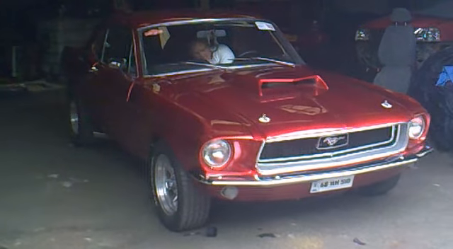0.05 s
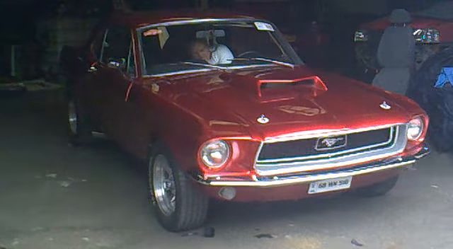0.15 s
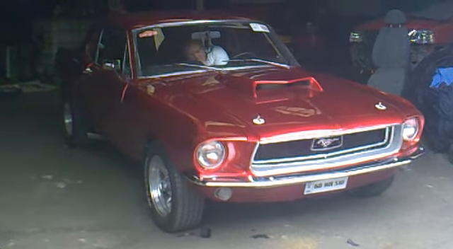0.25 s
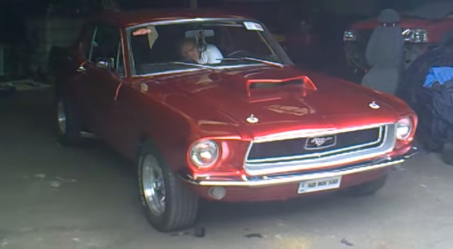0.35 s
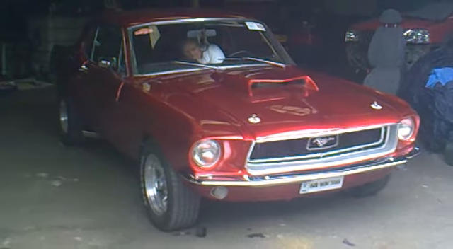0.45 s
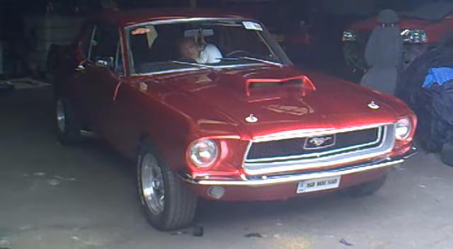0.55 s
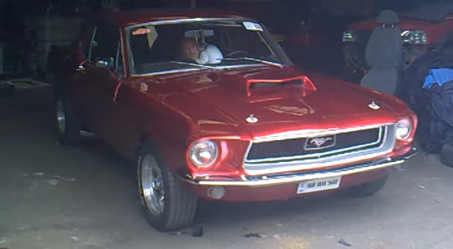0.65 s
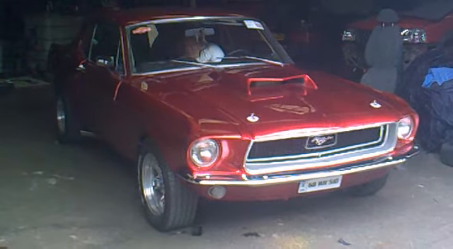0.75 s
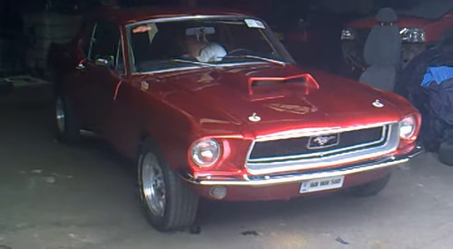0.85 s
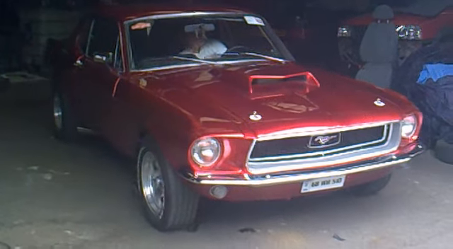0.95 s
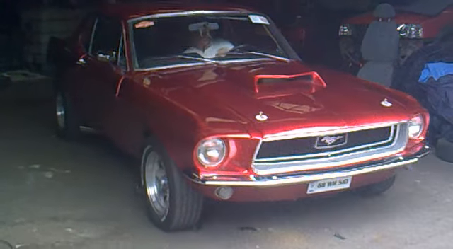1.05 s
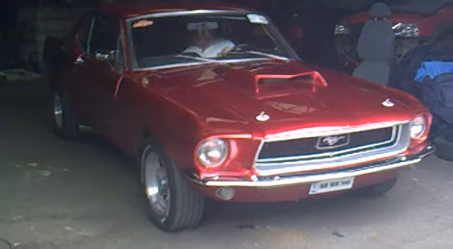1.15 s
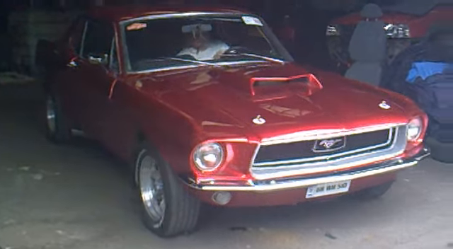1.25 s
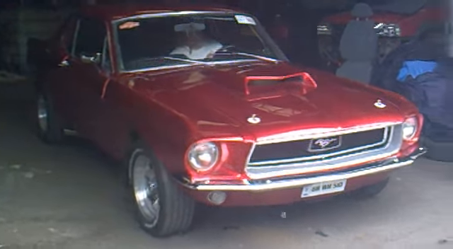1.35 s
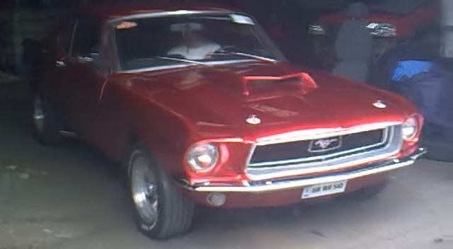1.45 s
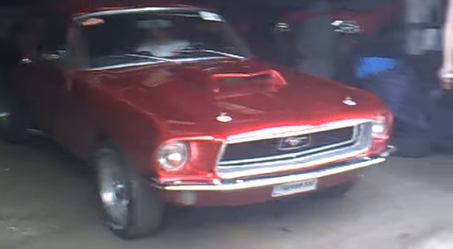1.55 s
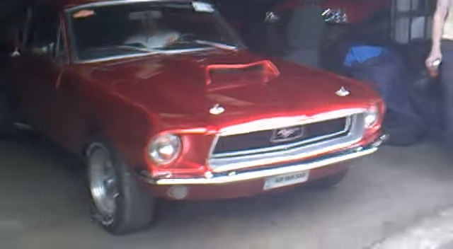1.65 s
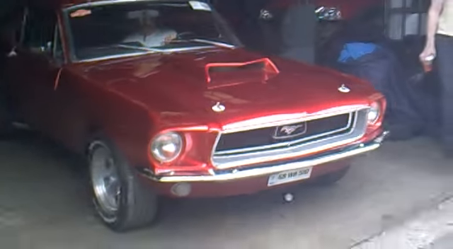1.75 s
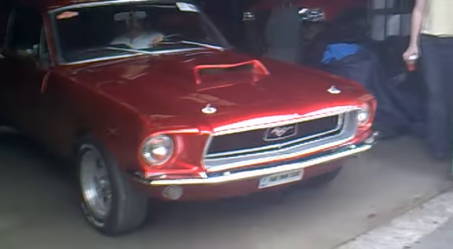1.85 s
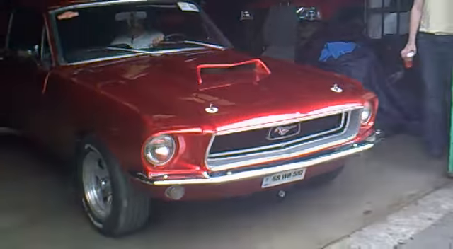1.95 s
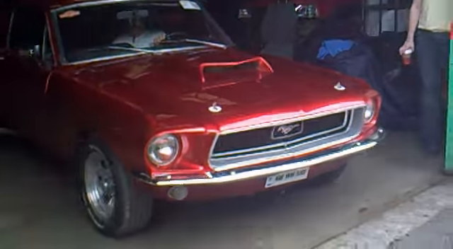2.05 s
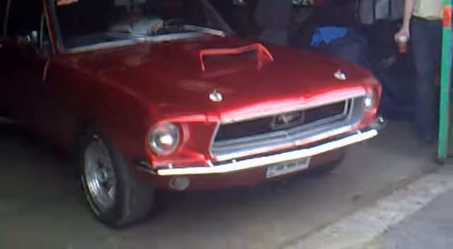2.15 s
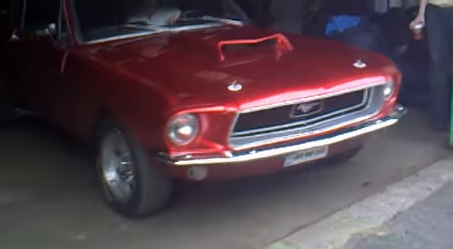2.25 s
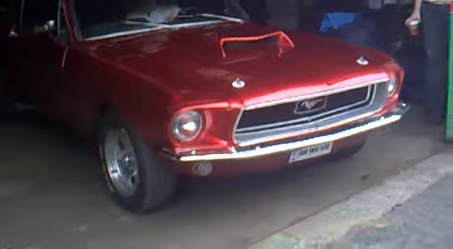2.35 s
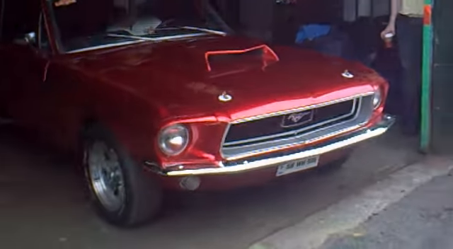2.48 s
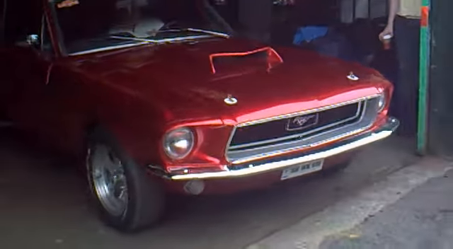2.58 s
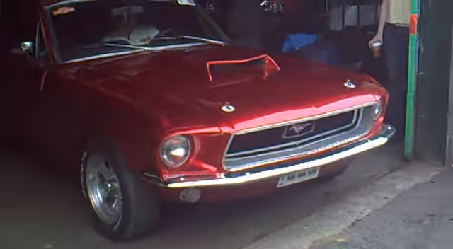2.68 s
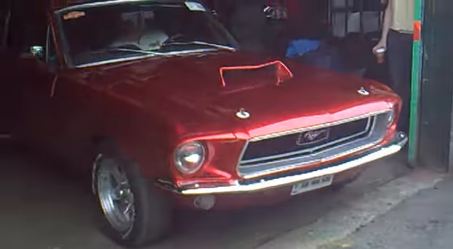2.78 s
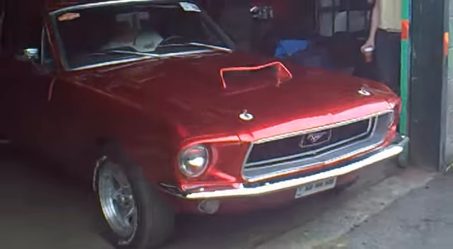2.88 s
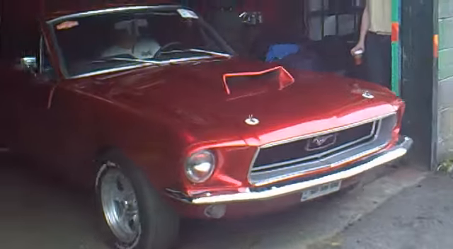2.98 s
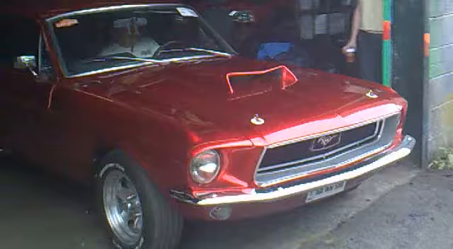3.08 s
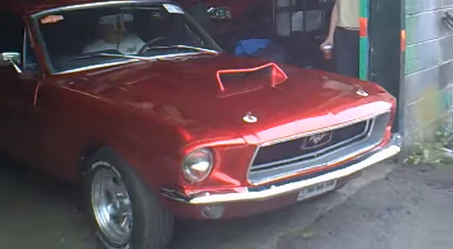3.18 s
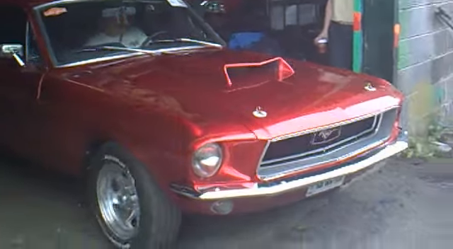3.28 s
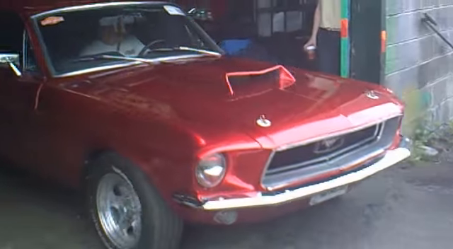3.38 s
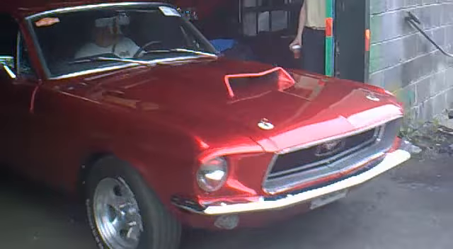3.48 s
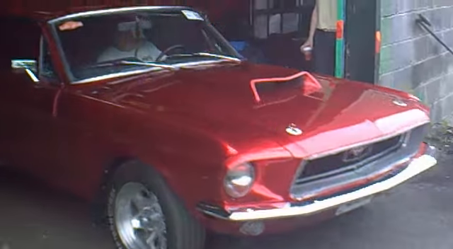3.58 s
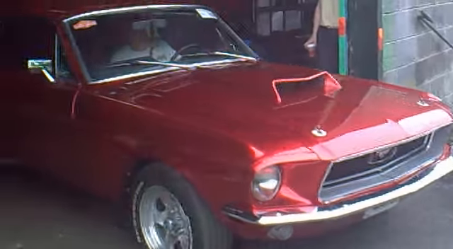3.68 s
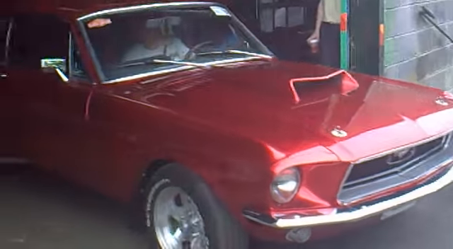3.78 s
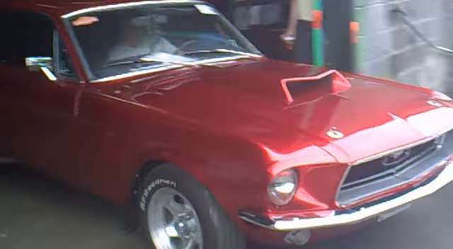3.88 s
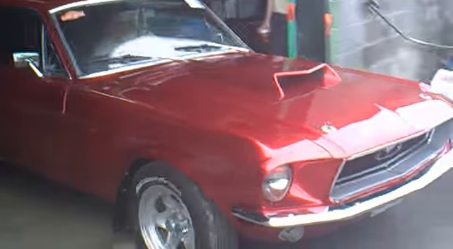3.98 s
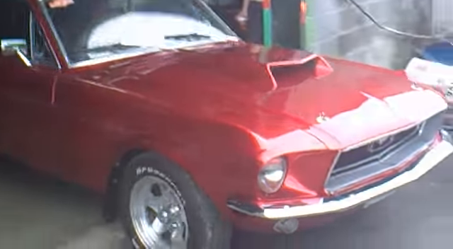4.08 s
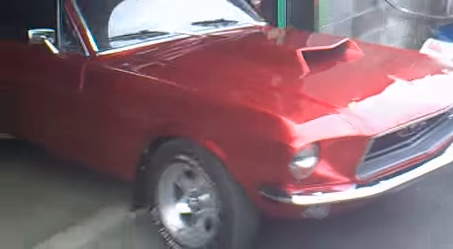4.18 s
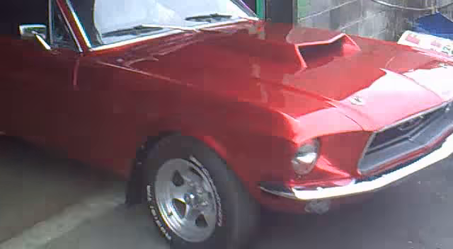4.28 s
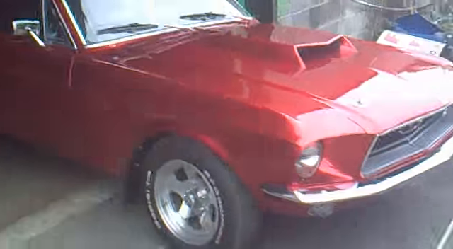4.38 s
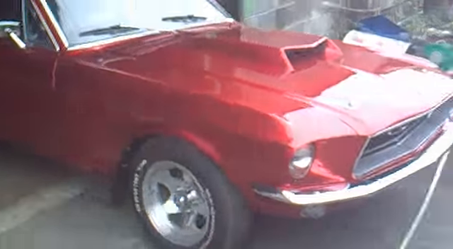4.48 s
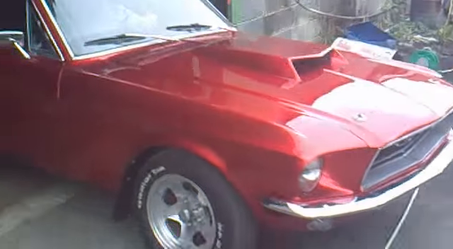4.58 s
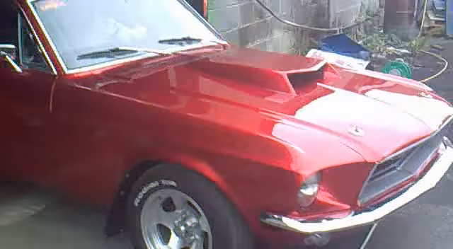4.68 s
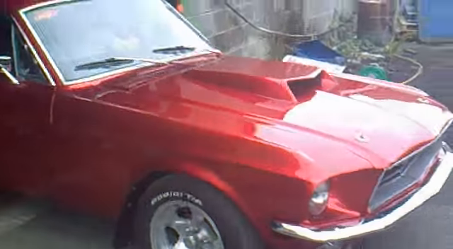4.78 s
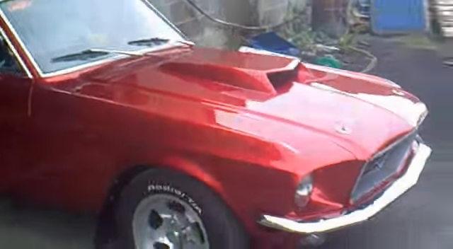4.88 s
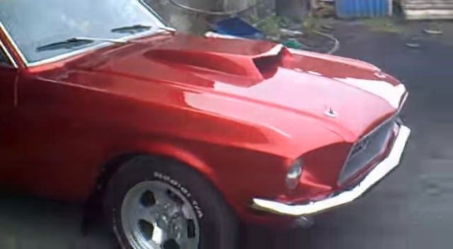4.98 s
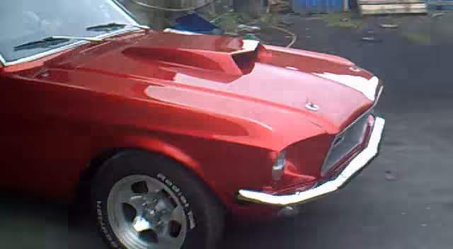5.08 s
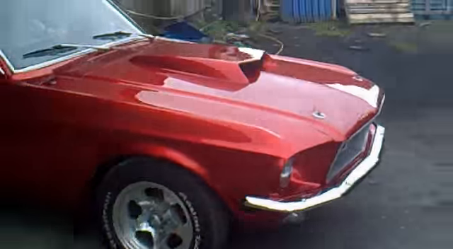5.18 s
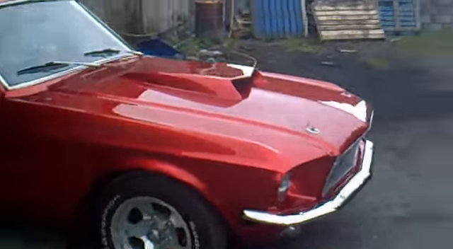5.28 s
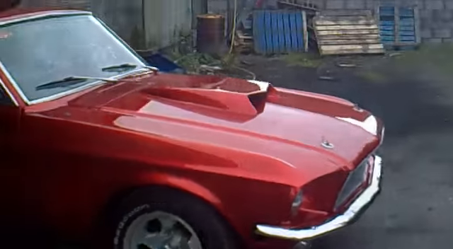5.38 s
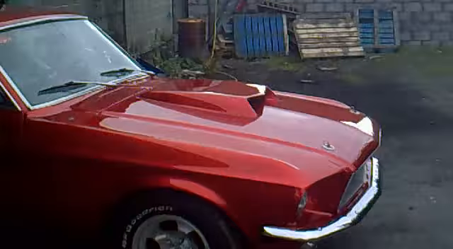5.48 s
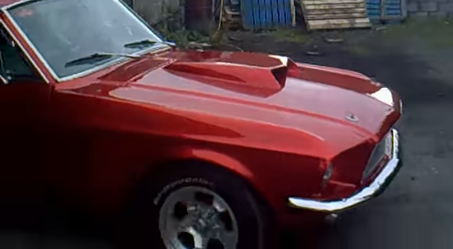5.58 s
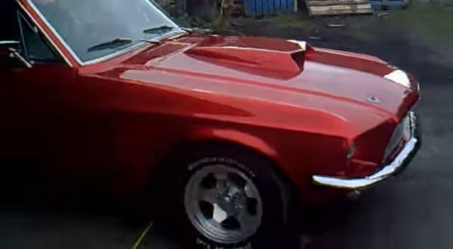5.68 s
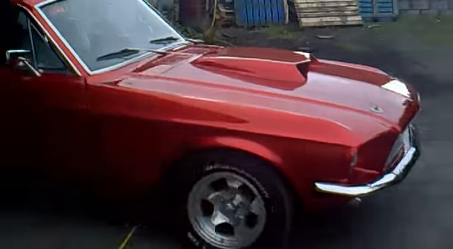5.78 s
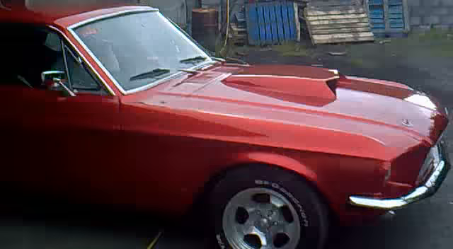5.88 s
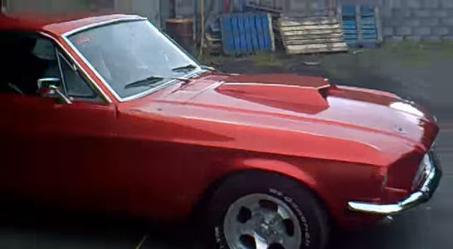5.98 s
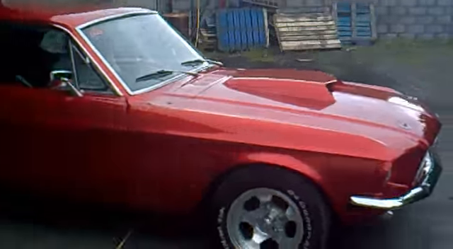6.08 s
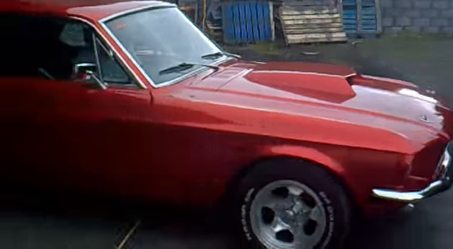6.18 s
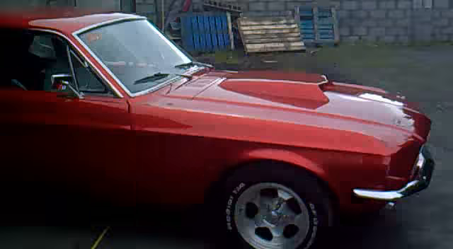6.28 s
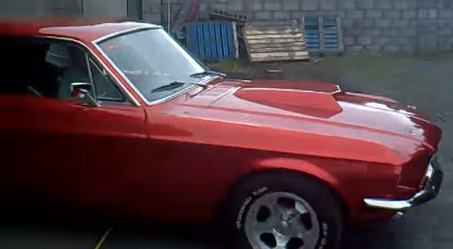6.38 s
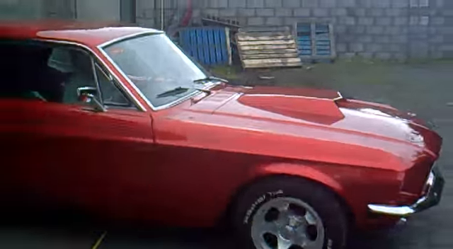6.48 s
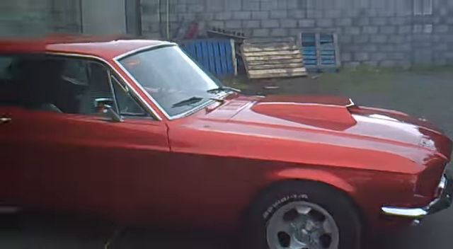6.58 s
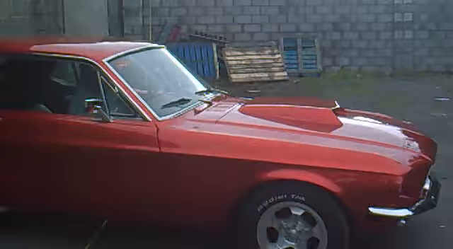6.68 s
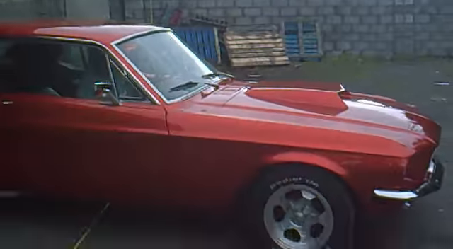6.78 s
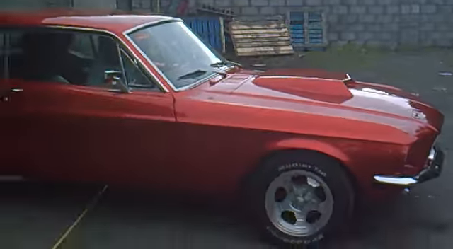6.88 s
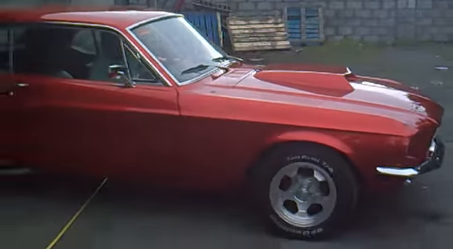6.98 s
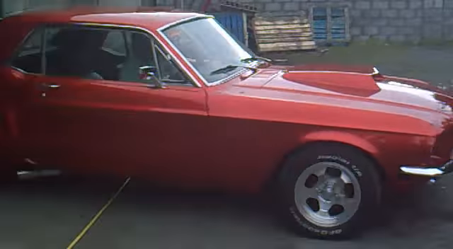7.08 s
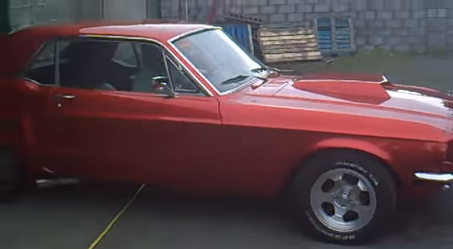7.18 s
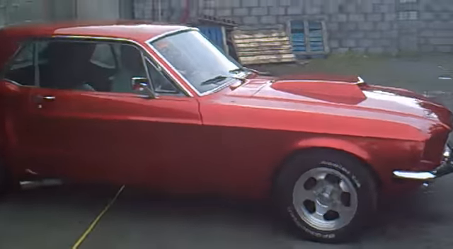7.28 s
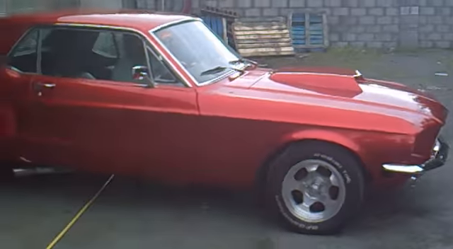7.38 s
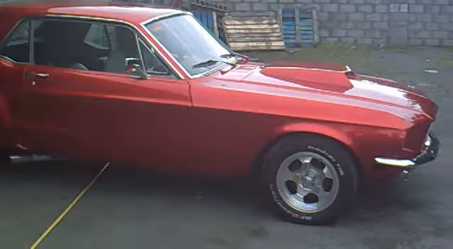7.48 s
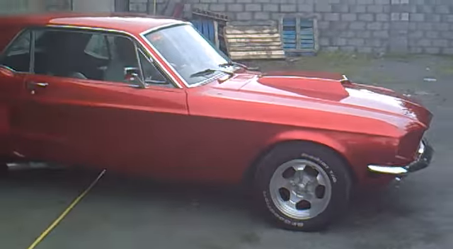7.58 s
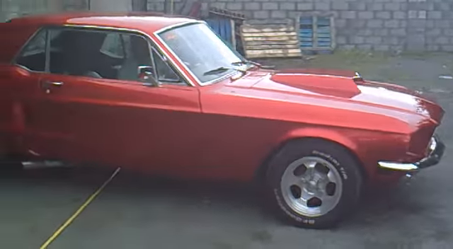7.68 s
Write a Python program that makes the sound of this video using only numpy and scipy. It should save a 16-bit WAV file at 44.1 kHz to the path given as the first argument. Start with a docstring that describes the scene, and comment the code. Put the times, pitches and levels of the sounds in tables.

```python
"""An eight-cylinder car idles fast in a garage, drops its revs with two sharp backfire cracks and creeps
out into a yard. Its exhaust drone is a sum of crank orders phased by uneven firing, plus rough noise.
The near cylinder bank chuffs from its side pipe: gated noise through pipe resonances.
The engine bay rushes as coloured noise; backfires ring the silencer shell; a brake squeaks faintly."""
import sys
import numpy as np
from scipy import signal
from scipy.fft import rfft, irfft, next_fast_len
from scipy.io import wavfile
from scipy.ndimage import map_coordinates

SR = 44100
rng = np.random.default_rng(int(sys.argv[2]) if len(sys.argv) > 2 else 0)


def inscribe(sig):
    """Save sig as 16-bit PCM at rate SR to the path in sys.argv[1].

    A 1-D sig is mono; a 2-D sig holds one channel per row.
    Samples are clipped to [-1, 1] before scaling.
    """
    pcm = np.round(np.clip(np.atleast_2d(sig).T, -1, 1) * 32767)
    wavfile.write(sys.argv[1], SR, pcm.astype(np.int16))


def level_to_linear(level):
    """Convert decibel levels to linear amplitude factors, elementwise."""
    exponent = np.asarray(level, float) / 20
    return 10 ** exponent


N = 341334

# engine speed: (time [s], four-stroke cycles [1/s])
SPEED = [(0.0, 12.149), (0.375, 12.711), (0.75, 12.685), (1.0, 9.393), (1.125, 8.005), (1.25, 8.191),
         (1.75, 9.499), (2.75, 9.272), (3.25, 9.288), (4.0, 9.351), (4.25, 8.511), (4.75, 8.677),
         (5.25, 8.602), (5.75, 8.734), (6.0, 8.434), (6.25, 8.518), (7.25, 8.325), (7.74, 8.074)]
# relative pulse size of each firing in a cycle; near bank 0, 3, 5, 6; sets the phases of the orders
FIRING = [.9, .5, .24, 1, .47, .82, .72, .1]
# place and exhaust: (time [s], place [0 fast idle, 1 doorway, 2 yard; held beyond],
# fade of all but the two strong orders [dB], rough burning before the fade [dB])
PLACE = [(0, 0, -0.5, -49), (.78, 0, 0.5, -49), (1.1, 0.46, -3.5, -46), (1.22, 1.3, -1, -40),
         (1.4, 1.4, -0.5, -38), (1.6, 1.1, -0.5, -39.5), (1.9, 1, -1.5, -45), (4.0, 1.3, -1, -40),
         (4.7, 2, 0.5, -44), (5.8, 2.2, 0.5, -41.5), (7.5, 2, 1, -43.5), (7.74, 3.5, -9.5, -40)]

# two strong drone orders: (time [s], order 8 [dB], order 11 [dB])
STRONG_ORDERS = [(0, -32, -41), (.2, -42, -44), (.6, -33.5, -42), (.75, -44, -42), (.88, -24.5, -39),
                 (.95, -31, -40), (.99, -25, -34), (1.025, -38, -38), (1.12, -42, -38.5), (1.2, -42, -29),
                 (1.45, -29, -31.5), (1.6, -24, -28), (1.7, -22.5, -33.5), (1.95, -28.5, -35),
                 (3.25, -24.5, -31.5), (3.8, -35, -31.5), (4.08, -34, -30), (4.2, -26, -31.5),
                 (4.4, -30, -37.5), (4.6, -29, -27.5), (5.4, -37, -22), (6.4, -29.5, -24),
                 (7.1, -29, -23.5), (7.5, -36, -25.5), (7.74, -41, -36.5)]
# orders that stand out: (multiple of cycle rate, fast idle [dB], doorway [dB], yard [dB])
STANDOUT_ORDERS = [(5, -49, -47, -41), (7, -42, -47, -50), (9, -46, -39, -39), (10, -57, -40.5, -41.5),
                   (12, -54, -50, -57), (13, -50, -46, -40), (15, -46, -48, -52), (16, -38, -48, -49),
                   (19, -57, -43, -44), (21, -44, -50, -45), (23, -56, -48, -48), (18, -47, -54, -58),
                   (22, -54, -57, -57), (24, -49, -52, -53), (25, -58, -64, -54), (26, -58, -53, -46),
                   (27, -44, -52, -54), (30, -59, -51, -46), (31, -69, -50, -58), (32, -71, -55, -58),
                   (33, -71, -62, -56), (35, -70, -60, -59), (37, -70, -62, -57), (42, -54, -67, -64)]
# knots of the slope of all other orders: (multiple of cycle rate, fast idle [dB], doorway [dB], yard [dB])
LESSER_ORDERS = [(3, -63, -56, -52), (6, -46, -53, -58), (14, -52, -50, -45), (17, -46, -49, -54),
                 (20, -58, -49, -48), (29, -61, -65, -54), (33, -72, -61, -62), (41, -69, -69, -65)]
# orders left off the slope: 4 cancels between the banks; 8 and 11 have their own curve
OFF_SLOPE = (4, 8, 11)
# orders that the standing wave in the pipe sends out with opposite sign
INVERTED = (6, 7, 13, 29, 30)
# orders that turn over in the doorway
DOORWAY_INVERTED = (5, 12, 24)
# orders whose phase runs late in the doorway
DOORWAY_LATE = (3, 5, 6, 7, 10, 14, 23)
# orders whose phase runs early in the doorway
DOORWAY_EARLY = (15, 19)
# uneven burning between the orders: (frequency [Hz], relative level [dB per Hz])
ROUGH = [(20, -25), (45, -12), (90, -1), (180, -3), (280, -6), (350, -4.5), (400, -24), (480, -27),
         (600, -45), (900, -120)]
# body shake below the drone: (frequency [Hz], relative level [dB per Hz])
RUMBLE = [(8, -20), (22, 0), (50, -2), (70, -20), (120, -120)]

# engine-bay rush: (time [s], level before band offsets [dB])
RUSH = [(0, -46), (.52, -44.5), (.99, -46), (1.22, -50.5), (1.36, -42), (1.7, -39), (1.9, -42),
        (2.5, -42.5), (2.82, -41.5), (3.1, -41.5), (3.9, -42), (4.12, -44.5), (4.35, -45.5), (4.7, -42),
        (5.6, -41), (6.8, -41), (7.07, -41.5), (7.5, -43), (7.63, -43), (7.74, -50)]
# offset from the rush for pipe body, mouth, hiss: (fast idle [dB], doorway [dB], yard [dB])
BAND_OFFSETS = [(-1, -2, -4.5), (-0.8, -0.46, -1.56), (-10, -9.5, -10.5)]
# steady engine-bay colour, pipe-body range: (frequency [Hz], relative level [dB per Hz])
BODY_COLOUR = [(240, -43), (400, -5), (437, -16), (647, 2), (773, -5), (844, -2.5), (914, -17.5),
               (1150, -15.5), (1500, -43), (2530, -120)]
# the same in the range of the mouth
MOUTH_COLOUR = [(620, -27), (1050, -4.5), (1260, -6.5), (1400, -4), (1520, -4), (1690, -5.5), (2170, -0.5),
                (3380, -11), (3500, -13), (4550, -15.5), (7700, -120)]
# the same in the hiss range
HISS_COLOUR = [(1940, -4), (3300, -9.5), (4550, -10.5), (4830, -8.5), (5220, -7), (6440, -3), (8370, -14.5),
               (9990, -13.5), (12200, -16.5), (13300, -23), (15100, -17.5), (15800, -33)]

# near-bank chuffs: (firing [eighths of a cycle], body [dB], mouth [dB], hiss [dB], collector [dB],
# body gain in the yard [dB], low thump [dB])
CHUFFS = [(0, -10, -4.5, 6.5, 2.5, 6, -3.5), (3.001, -10, -4.5, 8, -8, 7, -13),
          (5, -4, -5, -4, -3.5, -4, -4.5), (6, -4.5, -1.5, 7, 4, -2, 0)]
# hardest chuffs: (time [s], extra level before each band's accent share [dB])
ACCENTS = [(3.786, 1.5), (5.458, 4.5), (5.505, 3), (5.573, 3.5), (5.687, 6.5), (5.717, 5.5), (5.73, 3),
           (5.801, 5.5), (5.949, 4), (6.037, 4.5), (6.082, 3), (6.199, 5), (6.317, 3), (6.389, 3.5),
           (6.537, 4), (6.67, 7), (6.7, 4), (6.79, 4.5), (6.938, 3), (7.148, 3), (7.223, 4), (7.253, 5),
           (7.419, 4), (7.463, 4), (7.623, 2)]
# side pipe turning toward the microphone, chuff share of each band, clipped to 0-1:
# (time [s], pipe body, mouth, jet)
PIPE_SHARE = [(0, 0.12, 0, 0.013), (1.3, 0.03, 0.047, 0.22), (2.2, 0.63, 0.34, 0.18),
              (3.0, 0.95, 0.2, 0.25), (3.6, 0.78, 0.49, 0.25), (4.6, 0.56, 0.45, 0.41),
              (5.5, 0.16, 0.67, 0.51), (6.4, 0.18, 0.79, 0.56), (7.3, 0.22, 0.79, 0.62),
              (7.74, 0.057, 0.88, 0.6)]
# chuff resonances of pipe body, mouth, jet: (frequency [Hz], width per pass [Hz], relative level [dB])
RINGS = [
    [(617, 180, 4.5), (704, 144, 3.5), (832, 180, -1.5)],
    [(1840, 300, 0), (2190, 290, 4), (2504, 303, 2.5)],
    [(3600, 310, -3), (4630, 920, -1), (6000, 1670, 5), (8500, 2100, -4), (10600, 2900, -7.5),
     (14500, 3500, -15)],
]
# mouth rings trading places as the car rolls by: (time [s], gain of ring 1, 2, 3 [dB])
MOUTH_GAINS = [(4.6, 0, 0.37, -0.98), (5.2, -1, -0.7, 0.64), (5.7, -1.8, -2, 2.5), (6.2, 0.25, 1.2, -1.2),
               (6.8, -0.73, 1.5, -2), (7.4, -1.4, -0.13, 0.32)]
# collector rings: (frequency [Hz], width per pass [Hz])
COLLECTOR_RINGS = [(880, 141), (1240, 95), (1510, 100)]
# they come and go as the car turns: (time [s], level of ring 1, 2, 3 [dB])
COLLECTOR_LEVELS = [(0, -67, -61.5, -57), (1.6, -58, -58, -69), (2.2, -54, -51, -64), (2.9, -51, -50, -63),
                    (3.6, -52, -57, -57), (4.1, -50, -56, -53), (4.7, -49, -53, -48.5),
                    (5.2, -53, -54, -59), (6, -55, -65, -58), (6.8, -63, -57.5, -66), (7.3, -70, -49, -59),
                    (7.74, -71, -58, -70)]
# thin high ping on the chuffs while the car passes the doorway: (time [s], level [dB])
PING = [(1.9, -75), (2.3, -62), (2.6, -60), (3.0, -58), (3.3, -58), (3.6, -72), (4.3, -68), (4.8, -62),
        (5.3, -75)]

# backfires and rattling after-pops: (time [s], peak [dB], favoured ring [Hz], crack [dB],
# rise constant [s], garage gain [dB])
BANGS = [(1.1955, -2.5, 740, -7.5, 0.00044, -12), (1.212, -17, 1150, -15, 0.0017, -3),
         (1.232, -26, 900, -21, .003, -4), (1.257, -25, 850, -15, 0.0036, -5),
         (1.268, -19.5, 845, -15, 0.0021, -2), (1.298, 0, 2400, -1.5, 0.00017, -12.5),
         (1.355, -28, 3020, -7, .003, 8.5), (1.411, -22, 1480, -7, 0.0058, -2),
         (1.538, -21.5, 1420, -6, 0.003, -7), (1.553, -25, 1600, -6, .003, -5)]
# silencer modes: (frequency [Hz], level [dB], t60 [s])
SHELL = [(722, -1.5, 0.036), (835, -4, 0.035), (1050, -10, 0.04), (1272, -3, 0.052), (1440, -6.5, 0.044),
         (1666, 0.5, 0.029), (2224, -3, 0.02), (2930, -3, 0.016), (3270, -3.5, 0.018)]
# crack colour: (frequency [Hz], relative level [dB per Hz])
CRACK = [(300, -62), (600, -26), (850, -2.5), (1700, 2), (3000, 1), (4000, -8), (5200, -8.5), (7500, -14),
         (12000, -22.5), (16000, -37)]
# garage decay: (frequency [Hz], t60 [s])
GARAGE = [(500, 0.55), (2000, 0.46), (10000, 0.43)]
# thin whines and squeaks: (time [s], length [s], frequency [Hz], level [dB])
SQUEAKS = [(.23, 0.51, 1470, -50.5), (2.358, 0.063, 10150, -61), (4.055, 0.075, 10100, -59),
           (4.5, 0.077, 10220, -57), (4.6, .06, 10100, -70)]

FIRINGS = len(FIRING)
LAG_EIGHTHS = .04  # sound behind the crank
CHUFF_LEAD_EIGHTHS = .2  # chuff starts before the crest of its pressure pulse
BODY_LEAD_EIGHTHS = .302  # pipe body ahead of mouth and jet
THUMP_LEAD_EIGHTHS = .59
FAST_IDLE_HZ = 12.1  # cycles per s


def unit(x):
    """Scaled to rms 1."""
    return x / np.sqrt(np.mean(x ** 2) + 1e-20)


def along(points, hz):
    """Interpolates (Hz, value) points on a log frequency axis."""
    f, v = np.transpose(points)
    return np.interp(np.log(hz + 1), np.log(f + 1), v)


def curves(rows):
    """One value per sample for each column after the time."""
    s, *cols = np.transpose(rows)
    return [np.interp(np.arange(N) / SR, s, c) for c in cols]


def wobble(rate_hz):
    """Random curve, straight between rate_hz knots a second."""
    knots = rng.standard_normal(int(N * rate_hz / SR) + 4)
    return map_coordinates(knots, [np.arange(N) * rate_hz / SR], order=1)


def coloured(x, spectrum):
    """x through a spectrum, at rms 1."""
    m = next_fast_len(len(x) + 8192)
    gain = level_to_linear(along(spectrum, np.fft.rfftfreq(m, 1 / SR)))
    return unit(irfft(rfft(x, m) * gain, m)[:len(x)])


def ringing(x, hz, width_hz):
    """x through one resonance, twice, at rms 1."""
    m = next_fast_len(len(x) + 8192)
    f = np.fft.rfftfreq(m, 1 / SR)
    response = 1j * f * width_hz / (hz * hz - f * f + 1j * f * width_hz)
    return unit(irfft(rfft(x, m) * response ** 2, m)[:len(x)])


def crank():
    """Four-stroke cycles turned since the start, less the lag of the sound."""
    return np.cumsum(curves(SPEED)[0]) / SR - LAG_EIGHTHS / FIRINGS


def scatter(cycle, db):
    """Random dB for every cycle and near-bank firing."""
    return db * rng.standard_normal((int(cycle[-1]) + 3, len(CHUFFS)))


def chuffs(cycle, sizes_db, rise_s, t60_s, accent, pop=0):
    """Noise gated by each near-bank firing: quick rise, short decay; pop is the leading pressure step."""
    kicks = np.zeros(N)
    for (firing, *_), size_db in zip(CHUFFS, sizes_db.T):
        at = np.flatnonzero(np.diff(np.floor(cycle - firing / FIRINGS)) > 0)
        kicks[at] = level_to_linear(size_db[:len(at)])
    for s, extra_db in ACCENTS:
        kicks[round((s - .008) * SR):round((s + .005) * SR)] *= level_to_linear(accent * extra_db)
    t = np.arange(SR // 10) / SR
    envelope = (1 - np.exp(-t / rise_s)) * level_to_linear(-60 * t / t60_s)
    gate = signal.fftconvolve(kicks, envelope)[:N]
    return gate * rng.standard_normal(N) + pop * kicks


def squeaks():
    """Short friction tones, slightly unsteady in pitch and level."""
    out = np.zeros(N)
    for s, length_s, hz, db in SQUEAKS:
        at = slice(round(s * SR), round((s + length_s) * SR))
        turns = np.cumsum(hz * (1 + 0.0024 * wobble(60)[at])) / SR
        level = level_to_linear(db + 2 * wobble(30)[at]) * signal.windows.tukey(len(turns), .25)
        out[at] = level * np.sin(2 * np.pi * turns)
    return out


def rush_and_chuffs(cycle):
    """Steady engine-bay noise mixed with the chuffs by band; each chuff rings each mode at a new strength."""
    # (steady colour, rise s, t60 s, scatter dB, accent share, pop)
    bands = [(BODY_COLOUR, .003, .09, 1.4, .6, 4),
             (MOUTH_COLOUR, .001, .05, 2.1, 1.05, 10),
             (HISS_COLOUR, .0022, .068, 3, .2, 0)]
    burn_db = scatter(cycle, 0.62)  # shared by all bands
    level_db, place = curves(RUSH)[0], curves(PLACE)[0]
    outdoors = np.clip(np.interp(np.arange(len(burn_db)), cycle, place) - 1, 0, 1)
    yard_db = np.outer(outdoors, np.array(CHUFFS)[:, 5])
    out = 0
    for k, (band, offset_db, share) in enumerate(zip(bands, BAND_OFFSETS, curves(PIPE_SHARE))):
        colour, rise_s, t60_s, scatter_db, accent, pop = band
        lead = (CHUFF_LEAD_EIGHTHS + (k == 0) * BODY_LEAD_EIGHTHS) / FIRINGS
        turns_db = curves(MOUTH_GAINS) if k == 1 else np.zeros(len(RINGS[k]))
        gated = 0
        for (hz, width_hz, ring_db), turn_db in zip(RINGS[k], turns_db):
            sizes_db = np.array(CHUFFS)[:, k + 1] + burn_db + scatter(cycle, scatter_db) + (k == 0) * yard_db
            blown = chuffs(cycle + lead, sizes_db, rise_s, t60_s, accent, pop)
            gated = gated + level_to_linear(ring_db + turn_db) * ringing(blown, hz, width_hz)
        steady = coloured(rng.standard_normal(N) * level_to_linear(0.93 * wobble(20)), colour)
        share = np.clip(share, 0, 1)
        mixed = np.sqrt(1 - share) * steady + np.sqrt(share) * unit(gated)
        out = out + level_to_linear(level_db + np.interp(place, range(3), offset_db) + 3.75 * share) * mixed
    return out


def ping(cycle):
    """A narrow ring struck by every chuff, sized by its hiss."""
    sizes_db = np.array(CHUFFS)[:, 3] + scatter(cycle, 2.9)
    struck = chuffs(cycle + CHUFF_LEAD_EIGHTHS / FIRINGS, sizes_db, .001, .04, accent=0, pop=8)
    return level_to_linear(curves(PING)[0]) * ringing(struck, hz=3665, width_hz=190)


def collector(cycle):
    """Chuffs ringing the exhaust collector."""
    out = 0
    for (hz, width_hz), db in zip(COLLECTOR_RINGS, curves(COLLECTOR_LEVELS)):
        sizes_db = np.array(CHUFFS)[:, 4] + scatter(cycle, 3)
        blown = chuffs(cycle + CHUFF_LEAD_EIGHTHS / FIRINGS, sizes_db, 0.00051, 0.074, accent=0.27)
        out = out + level_to_linear(db) * ringing(blown, hz, width_hz)
    return out


def garage(x):
    """Delayed noise tail; each frequency of the walls' answer dies at its own speed."""
    hz, t, z = signal.stft(rng.standard_normal(SR // 2), SR, nperseg=256)
    tail = signal.istft(z * level_to_linear(-60 * t / along(GARAGE, hz)[:, None]), SR, nperseg=256)[1]
    return signal.fftconvolve(np.pad(x, (300, 0)), tail / np.linalg.norm(tail))


def shell_ring(t, best_hz):
    """Decaying silencer modes, detuned per blow, phase-walking, weaker away from best_hz."""
    off_pitch_db_per_octave, detune, rattle_rad = 8, 0.02, 0.048  # rattle: phase step per sample
    out = 0
    for hz, mode_db, t60_s in SHELL:
        db = mode_db + rng.normal(0, 1.4) - off_pitch_db_per_octave * abs(np.log2(hz / best_hz))
        phase = 2 * np.pi * (hz * rng.normal(1, detune) * t + rng.random())
        walk = np.cumsum(rng.normal(0, rattle_rad, len(t)))
        out = out + level_to_linear(db - 60 * t / t60_s) * np.sin(phase + walk)
    return out


def backfires():
    """A crack of noise, the silencer shell's ring and the air column's hum, answered by the garage."""
    blast_db, blast_s = 2, 0.0018  # the first instant is hotter than the ring
    boom_hz, boom_db, boom_t60_s = 226, -29, 0.4  # air column of the pipe
    highpass = signal.butter(5, 624, 'high', fs=SR, output='sos')  # small shell radiates little below
    out, t = np.zeros(N + SR), np.arange(SR // 10) / SR
    for s, peak_db, best_hz, crack_db, rise_s, room_db in BANGS:
        crack = level_to_linear(crack_db - 60 * t / 0.053) * coloured(rng.standard_normal(len(t)), CRACK)
        envelope = (1 - np.exp(-t / rise_s)) * (1 + level_to_linear(blast_db) * np.exp(-t / blast_s))
        burst = signal.sosfilt(highpass, (shell_ring(t, best_hz) + crack) * envelope)
        burst = level_to_linear(peak_db) * burst / np.max(np.abs(burst))
        boom = level_to_linear(peak_db + boom_db - 60 * t / boom_t60_s) * np.sin(2 * np.pi * boom_hz * t)
        boom = boom * signal.windows.tukey(len(t), .3)
        wet = level_to_linear(room_db) * garage(burst)
        out[round(s * SR):][:len(t)] += burst + boom
        out[round(s * SR):][:len(wet)] += wet
    return out[:N]


def rough_burning(cycle):
    """Uneven burning: low noise in a thump per near-bank firing, over a steady floor; rms 1."""
    between_db = -10  # level between thumps
    sizes_db = np.array(CHUFFS)[:, 6] + scatter(cycle, 2)
    thumps = unit(chuffs(cycle + THUMP_LEAD_EIGHTHS / FIRINGS, sizes_db, 0.0027, 0.15, accent=0))
    return coloured(thumps + level_to_linear(between_db) * rng.standard_normal(N), ROUGH)


def order_levels():
    """Rows (order, dB in each place): the slope, with the orders that stand out put in."""
    knots, *slopes = np.transpose(LESSER_ORDERS)
    rows = {k: [np.interp(k, knots, db) for db in slopes] for k in range(3, 42) if k not in OFF_SLOPE}
    rows.update({k: db for k, *db in STANDOUT_ORDERS})
    return [(k, *db) for k, db in rows.items()]


def drone(cycle):
    """Exhaust orders phased by uneven firing; deep in the garage, wall echoes scramble the higher ones."""
    deep_lag_cycles = .0625  # longer sound path from deep in the garage
    deep_early_turn = .17  # order 8 runs ahead in phase deep in the garage, in its own periods
    late_turn, early_turn = .15, .25  # doorway phase turns, in the order's own periods
    strong_waver_db, waver_db, indoor_waver_db = 1.5, 1.6, 1.5  # wall echoes add waver indoors
    phase = np.angle(np.fft.fft(FIRING))
    place, fade_db, rough_db = curves(PLACE)
    indoors = np.clip(1 - place, 0, 1)
    doorway = np.clip(2 - 5 * abs(place - 1), 0, 1)
    heard = cycle - deep_lag_cycles * indoors

    def order(k, turn):
        return np.sqrt(2) * np.cos(2 * np.pi * k * heard + phase[int(k) % FIRINGS] + turn)

    strong = 0
    for k, db in zip((8, 11), curves(STRONG_ORDERS)):
        turn = 2 * np.pi * deep_early_turn * indoors * (k == 8)
        strong = strong + level_to_linear(db + strong_waver_db * wobble(9)) * order(k, turn)

    orders, idle_db, door_db, yard_db = np.transpose(sorted(order_levels()))
    # below fast idle the garage's peaks stay at their pitch and higher orders pass through them
    slowed = np.minimum(curves(SPEED)[0] / FAST_IDLE_HZ, 1)
    weak = 0
    for k, door, yard in zip(orders, door_db, yard_db):
        db = np.interp(place, [1, 2], [door, yard])
        db = db + indoors * (np.interp(k * slowed, orders, idle_db) - door)
        turn = (k > 11) * indoors * 2 * np.pi * rng.random() + .012 * k * wobble(3)
        turn = turn + np.pi * ((k in INVERTED) + doorway * (k in DOORWAY_INVERTED))
        doorway_turn = early_turn * (k in DOORWAY_EARLY) - late_turn * (k in DOORWAY_LATE)
        turn = turn + 2 * np.pi * doorway * doorway_turn
        weak = weak + level_to_linear(db + (waver_db + indoor_waver_db * indoors) * wobble(4.5)) * order(k, turn)

    rough = level_to_linear(rough_db) * rough_burning(cycle)
    rumble = level_to_linear(-60 + 3 * wobble(6)) * coloured(rng.standard_normal(N), RUMBLE)
    return strong + level_to_linear(fade_db) * (weak + rough + rumble)


def scene():
    """The car heard from one microphone."""
    cycle = crank()
    exhaust = drone(cycle) + collector(cycle) + ping(cycle)
    return (squeaks() + rush_and_chuffs(cycle) + backfires() + exhaust)[None]


def band_limit(x):
    """A steep low-pass at the top of the band."""
    return signal.sosfilt(signal.butter(12, 16060, fs=SR, output="sos"), x)


def record(dry):
    """The input stage rounds off the loudest peaks."""
    full_swing = 0.62
    mix = dry / (1 + np.abs(dry / full_swing) ** 8) ** (1 / 8)
    return band_limit(mix)


dry = scene()
out = record(dry)
inscribe(out)
```